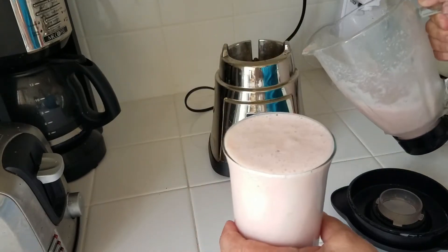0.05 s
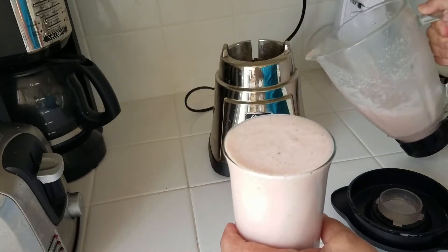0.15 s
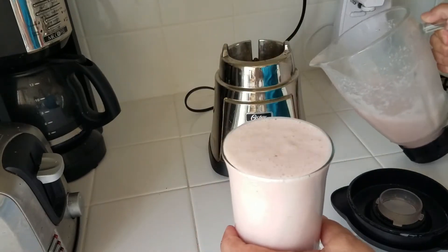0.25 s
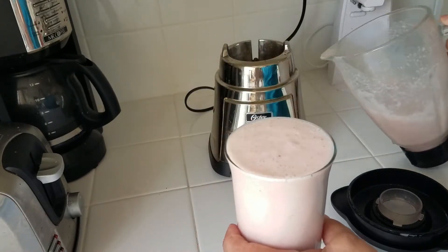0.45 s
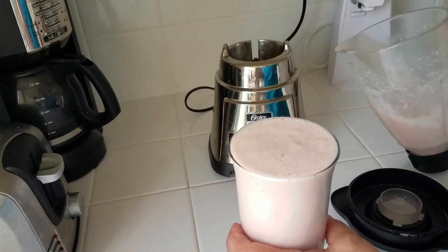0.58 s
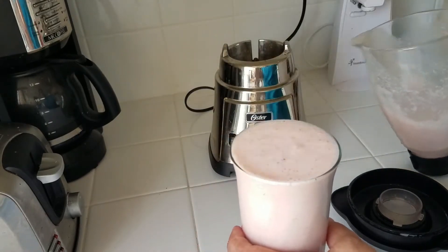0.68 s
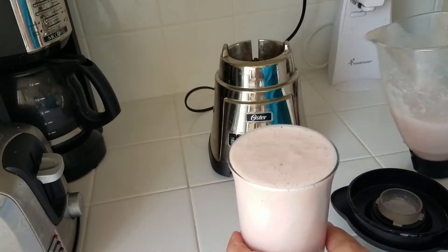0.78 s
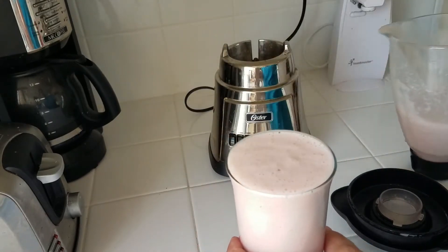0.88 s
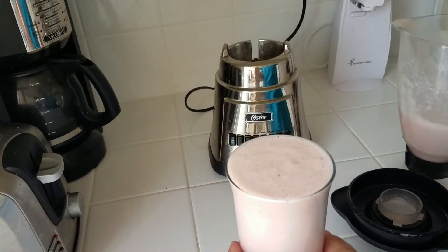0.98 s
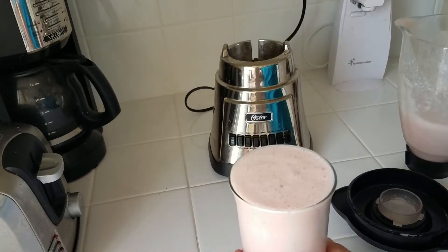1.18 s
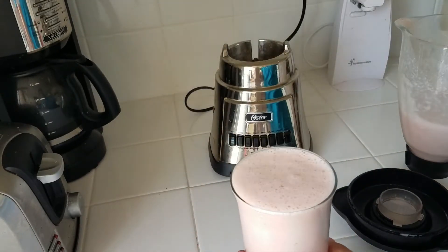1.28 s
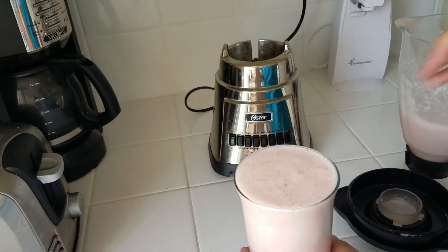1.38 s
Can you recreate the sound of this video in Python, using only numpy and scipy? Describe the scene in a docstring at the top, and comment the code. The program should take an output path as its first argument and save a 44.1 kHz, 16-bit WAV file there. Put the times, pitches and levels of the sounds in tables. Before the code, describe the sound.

Blender jar thuds and clinks onto kitchen tile, scuffs faintly, then tips flat with a clack

```python
"""Blender jar set down on a tiled counter

A glass blender jar with some shake left in it is set down in a small kitchen. One edge of its plastic collar
thuds and clacks while the glass clinks in the collar; the jar scuffs briefly over the tiles, then tips flat with
a soft bump and a hard clack; a faint bright hiss swells just before the hard clack and fades. Ringing modes make
the thuds and clinks; coloured noise makes the clacks, rattle, rubs, hiss, low room noise and reverberation."""
import sys
import numpy as np
from scipy import signal
from scipy.fft import rfft, irfft
from scipy.io import wavfile
from scipy.ndimage import uniform_filter1d

SR = 44100
rng = np.random.default_rng(int(sys.argv[2]) if len(sys.argv) > 2 else 0)


def digitize_waveform(pressure):
    """Quantize a signal to 16-bit integers and store it at the path in sys.argv[1].

    Rows of a 2-D input are taken as channels; values are limited to [-1, 1].
    """
    field = np.atleast_2d(pressure).T
    bounded = np.clip(field, -1, 1)
    quanta = np.round(bounded * 32767).astype(np.int16)
    wavfile.write(sys.argv[1], SR, quanta)


N = 63945   # length in samples
LEFT_RIGHT = np.array([[1], [-1]])   # opposite signs for the two sides


def from_db(db):
    """Decibels to gain."""
    return 10 ** (np.asarray(db) / 20)


def rms_one(x):
    """Scale to unit rms."""
    return x / np.sqrt(np.mean(x ** 2) + 1e-20)


def at_hz(points, hz, axis=1):
    """Read a column of a table on a log-frequency axis."""
    table = np.array(points, float)
    return np.interp(np.log(hz), np.log(table[:, 0]), table[:, axis])


def pan(db):
    """Gains that raise the left by so many dB and lower the right by as many."""
    return from_db(db * LEFT_RIGHT)


def since(s):
    """Seconds since a moment, negative before it."""
    return np.arange(N) / SR - s


def dying(s, t60):
    """Envelope that starts at once and falls by 60 dB in t60 seconds."""
    t = since(s)
    return (t >= 0) * np.exp(-np.log(1000) * np.maximum(t, 0) / t60)


def ring(s, hz, t60):
    """A struck mode: a sine under a dying envelope of height 1."""
    return dying(s, t60) * np.sin(2 * np.pi * hz * since(s))


def struck(hits, t60):
    """Envelope of something whose energy is topped up by each hit (s, dB)."""
    return np.sqrt(sum((from_db(db) * dying(s, t60)) ** 2 for s, db in hits))


# Likeness of left and right in every noise.
# Each row: frequency in Hz, likeness from 0 (unrelated) to 1 (identical).
LIKENESS = [(60, .998), (130, 0.98), (250, 0.79), (450, 0.84), (800, 0.08), (3000, 0), (16000, 0.06)]


def noise(spectrum):
    """Stereo noise of a given colour, alike in the bass and diffuse in the treble; rms 1."""
    hz = np.maximum(np.fft.rfftfreq(N, 1 / SR), 1)
    mid, side = rfft(rng.standard_normal((2, N)))
    alike = np.clip(at_hz(LIKENESS, hz), 0, 1)
    both = np.sqrt(1 + alike) * mid + np.sqrt(1 - alike) * side * LEFT_RIGHT
    return rms_one(irfft(both * from_db(at_hz(spectrum, hz)), N))


# Colour of the low room noise. Each row: frequency in Hz, relative level in dB per Hz.
ROOM_COLOUR = [(25, 0.5), (50, -3.5), (100, -0.5), (180, -6), (280, -4.5), (420, -6), (650, -16),
               (1200, -22), (2700, -27), (4500, -36.5), (8500, -43.5), (12500, -38), (16000, -37.5)]
ROOM_DB = -53.5


def room_noise():
    """Steady noise, strongest in the bass, that lies under everything."""
    return from_db(ROOM_DB) * noise(ROOM_COLOUR)


# Blows of the collar on the counter.
# Each row: start in seconds, thud level in dB, pitch of the contact in Hz, its t60 in seconds,
# clack level in dB, tick level in dB.
BLOWS = [(0.2204, -4, 128.3, 0.095, -29, -54), (0.238, -11, 167.7, 0.086, -31, -66),
         (0.2659, -16.5, 104, 0.14, -37, -75), (0.887, -46.5, 120, .1, -82, -95),
         (0.9715, -21.5, 299, 0.033, -44, -98), (0.9761, -13.5, 116.6, 0.21, -62, -92),
         (1.0174, -21.5, 320, 0.052, -29, -47.5), (1.0211, -17, 131, 0.15, -29.5, -58),
         (1.0338, -20, 238, 0.049, -60, -75), (1.0515, -18.5, 248, 0.093, -55, -71)]
# Modes of the counter with the jar on it, before the seated jar adds its damping.
# Each row: frequency in Hz, level in dB, t60 in seconds.
COUNTER_MODES = [(52.3, -16.5, 0.53), (82.4, -7, 0.12), (102, -10.5, 0.11), (128.5, -16, 0.21),
                 (170, -12.5, 0.21), (197.6, -20.5, 0.51), (236.6, -12.5, 0.194), (269.6, -8.5, 0.1995),
                 (307.2, -15.5, 0.23), (366.5, -17, 0.12), (433, -28, 0.19), (497.5, -26, 0.35),
                 (613, -31.5, 0.19), (724, -20, 0.11)]
THUD_RISE_S, THUD_PAN_DB = 0.0051, -0.06   # the rise is 60 dB complete in this time
COUNTER_SPREAD_RAD = 0.15   # each side is shifted by this phase, in opposite directions
SEATED_S, SEATED_T60_S = .85, 0.6   # for later blows the jar's weight damps the counter with this extra decay


def thuds():
    """Each blow is a springy contact that stirs the counter's modes, most of all those near its own pitch."""
    modes = []
    for k, (hz, db, t60) in enumerate(COUNTER_MODES):
        sign = (-1) ** k   # neighbouring modes start in opposite directions
        shift_s = sign * LEFT_RIGHT * COUNTER_SPREAD_RAD / (2 * np.pi * hz)
        modes.append((hz, sign * from_db(db) * ring(shift_s, hz, t60)))
    out = np.zeros((2, N))
    for s, db, contact_hz, contact_t60, _, _ in BLOWS:
        counter = sum(mode / np.hypot(1, hz / contact_hz - contact_hz / hz) for hz, mode in modes)
        if s > SEATED_S:
            counter = counter * dying(0, SEATED_T60_S)
        contact = ring(0, contact_hz, contact_t60)
        blow = (contact + counter) * (1 - dying(0, THUD_RISE_S))
        start = int(s * SR)
        out[:, start:] -= from_db(db) * blow[:, :N - start]
    return out * pan(THUD_PAN_DB)


# Dense, short ring of the collar and tiles. Each row: frequency in Hz, relative level in dB per Hz.
CLACK_COLOUR = [(150, -6.5), (330, 0), (500, 1.5), (750, -5.5), (1000, -8), (1400, -6), (2000, -19),
                (3000, -21.5), (6000, -31.5), (16000, -37.5)]
# Sharp edge of a hard contact. Each row: frequency in Hz, relative level in dB per Hz.
TICK_COLOUR = [(500, -27), (2000, -28), (4500, 7), (7500, -0.5), (10500, -7), (13000, 4), (16000, -17)]
CLACK_T60_S, TICK_T60_S = 0.11, 0.047
CRACK_DB, CRACK_T60_S = 9.5, 0.031   # level above the tick; the first instant is stronger and dies faster


def clacks():
    """Hard plastic on tile: a crack, a bright tick and a short, dense ring."""
    clack_hits = [(s, clack_db) for s, _, _, _, clack_db, _ in BLOWS]
    tick_hits = [(s, tick_db) for s, _, _, _, _, tick_db in BLOWS]
    clack = struck(clack_hits, CLACK_T60_S)
    crack = from_db(CRACK_DB) * struck(tick_hits, CRACK_T60_S)
    tick = np.hypot(struck(tick_hits, TICK_T60_S), crack)
    return clack * noise(CLACK_COLOUR) + tick * noise(TICK_COLOUR)


# Knocks of the glass in its collar. Each row: start in seconds, level in dB.
CLINKS = [(0.2223, -49), (0.2349, -33.5), (0.2424, -37.5), (0.268, -65)]
# Clear modes of the glass. Each row: frequency in Hz, level in dB, t60 in seconds.
GLASS_MODES = [(1262, -2, 0.17), (1390, -5.5, 0.27), (1560, -32, .2), (2369, -14, 0.2), (2470, -9.5, 0.36),
               (2855, -16, .17), (3670, -11.5, 0.43), (3954, -0.5, 0.11), (4850, -23, .19),
               (4992, -10.5, 0.26), (5244, -15, 0.18), (6770, -24.5, 0.29), (8985, -16.5, 0.07),
               (9880, -25, 0.12)]
# Faint, thin rings as the jar settles.
# Each row: start in seconds, frequency in Hz, level in dB, t60 in seconds.
PINGS = [(0.971, 3426, -61, 0.14), (1.022, 2846, -56.5, 0.3)]
GLASS_PAN_DB = 1
# The jar is not quite round: each mode has a weaker twin, higher by this share of its frequency.
TWIN_SPLIT, TWIN_DB = 0.00615, -8.5


def clinks():
    """Knocks ring the glass, each mode beating with its twin, differently per side; thin pings come later."""
    out = sum(from_db(db) * ring(s, hz, t60) for s, hz, db, t60 in PINGS)
    for hz, mode_db, t60 in GLASS_MODES:
        phase = 2 * np.pi * (hz * since(0) + rng.random())
        side_phase = rng.choice([-1, 1]) * np.pi / 6 * LEFT_RIGHT
        mode = np.sin(phase + side_phase)
        twin = np.sin(phase * (1 + TWIN_SPLIT) + 2 * np.pi * rng.random((2, 1)))
        envelope = from_db(mode_db) * struck(CLINKS, t60)
        out = out + envelope * (mode + from_db(TWIN_DB) * twin)
    return out * pan(GLASS_PAN_DB)


# The crowd of glass modes that the shake damps. Each row: frequency in Hz, relative level in dB per Hz.
RATTLE_COLOUR = [(300, -10.5), (700, -4.5), (1000, -7.5), (1400, 0.5), (2000, -5), (3000, -13.5),
                 (4200, -18.5), (5200, -13), (6000, -51), (7000, -18), (8000, -32), (9300, -30),
                 (11000, -34), (12200, -33), (16000, -41)]
RATTLE_DB, RATTLE_T60_S = 3.5, 0.17   # level relative to the knocks


def rattle():
    """The knocks also stir the damped modes of the glass, too many to tell apart, as dying noise."""
    return from_db(RATTLE_DB) * struck(CLINKS, RATTLE_T60_S) * noise(RATTLE_COLOUR)


# The kitchen's reverberation. Each row: frequency in Hz, relative level in dB, t60 in seconds.
KITCHEN = [(61, -13, 0.24), (198, -16, 0.57), (490, 0.5, 0.23), (1525, -12.5, 0.52), (3970, -11, 0.53),
           (8800, -19, 0.34), (16100, -5.5, 0.4)]
FIRST_ECHO_S = 0.0066


def kitchen(x):
    """Diffuse reverberation, dying at its own rate in each band of about an octave."""
    white = noise([(1, 0), (SR, 0)])
    response = 0
    edges = np.geomspace(35, 17000, 10)
    for low, high in zip(edges, edges[1:]):
        hz = np.sqrt(low * high)
        tail = dying(FIRST_ECHO_S, at_hz(KITCHEN, hz, axis=2))
        tail = tail / np.linalg.norm(tail)   # same energy whatever the decay
        band = signal.butter(2, [low, high], "band", fs=SR, output="sos")
        response = response + from_db(at_hz(KITCHEN, hz)) * signal.sosfiltfilt(band, white) * tail
    return signal.fftconvolve(x, response, axes=1)[:, :N]


# Rubs of the collar over the tiles. Each row: start in seconds, length before release in seconds, level in dB.
SCUFFS = [(0.606, 0.012, -52), (0.662, 0.042, -51.5), (0.699, .012, -54.5), (0.734, 0.034, -62)]
# Colour of the rubs. Each row: frequency in Hz, relative level in dB per Hz.
SCUFF_COLOUR = [(300, 3), (600, -4.5), (850, 4), (1400, 0.5), (2300, -1), (3300, -11.5), (5000, -23.5),
                (9000, -34), (16000, -32)]
SCUFF_ATTACK_S, SCUFF_RELEASE_S = 0.0091, 0.027   # linear rise, time constant of the fall
SCUFF_ROUGH_DB = 1.5   # rms wobble of the level


def scuffs():
    """Short, grainy rubs: noise under a pressure that rises and dies away, its level roughened at random."""
    pressure = 0
    for s, length, db in SCUFFS:
        attack = np.clip(since(s) / SCUFF_ATTACK_S, 0, 1)
        release = np.exp(-np.maximum(since(s + length), 0) / SCUFF_RELEASE_S)
        pressure = pressure + from_db(db) * attack * release
    grain = rms_one(uniform_filter1d(rng.standard_normal(N), size=130))   # smoothed over about 3 ms
    return pressure * from_db(SCUFF_ROUGH_DB * grain) * noise(SCUFF_COLOUR)


# Swell and fade of a faint bright hiss. Each row: time in seconds, level in dB.
HISS = [(0.90, -84), (0.945, -69), (0.975, -62), (1.005, -90)]
# Colour of the faint hiss. Each row: frequency in Hz, relative level in dB per Hz.
HISS_COLOUR = [(500, -2), (2500, -10), (4800, 5), (6300, -7), (8300, 0), (10500, -9), (13000, -3),
               (16000, -9)]


def hiss():
    """A faint bright hiss that swells just before the hard clack and fades: noise led through level points."""
    s, db = np.transpose(HISS)
    return np.interp(since(0), s, from_db(db), left=0, right=0) * noise(HISS_COLOUR)


BRIGHT_PAN_DB = -0.4   # for the clacks, rattle, scuffs and hiss
GLASS_WET_DB = -2   # how much of the clinks reaches the reverberation


def scene():
    """The jar on the counter, the kitchen's answer and its steady noise."""
    bright = (clacks() + rattle() + scuffs() + hiss()) * pan(BRIGHT_PAN_DB)
    jar = thuds() + bright
    glass = clinks()
    reverberation = kitchen(jar + from_db(GLASS_WET_DB) * glass)
    return room_noise() + jar + glass + reverberation


BASS_CUT_HZ, TREBLE_CUT_HZ = 48, 15900


def record(dry):
    """The microphone drops the deepest bass; a steep low-pass cuts the top."""
    bass_cut = signal.butter(3, BASS_CUT_HZ, "high", fs=SR, output="sos")
    treble_cut = signal.ellip(10, .2, 80, TREBLE_CUT_HZ, fs=SR, output="sos")
    return signal.sosfilt(treble_cut, signal.sosfilt(bass_cut, dry))


dry = scene()
out = record(dry)
digitize_waveform(out)
```